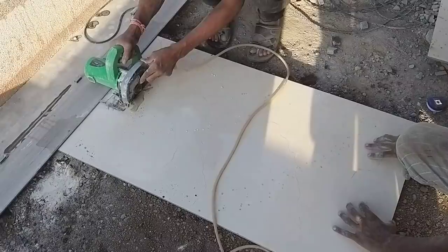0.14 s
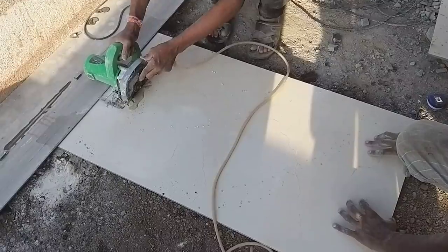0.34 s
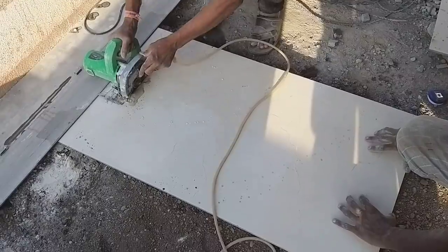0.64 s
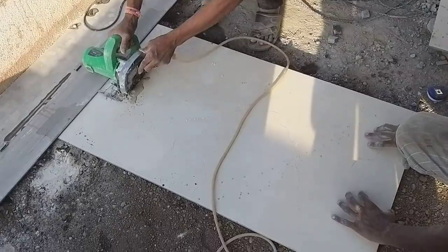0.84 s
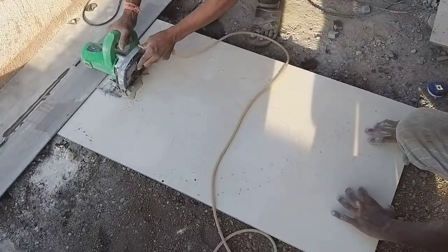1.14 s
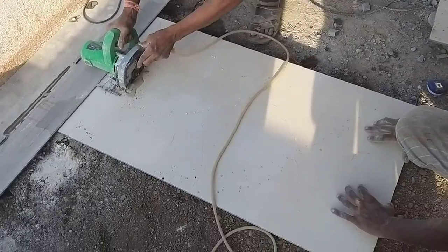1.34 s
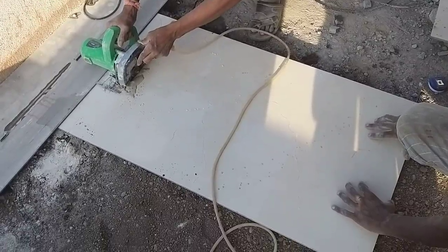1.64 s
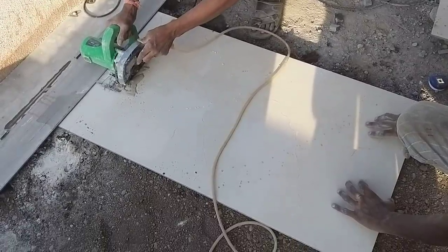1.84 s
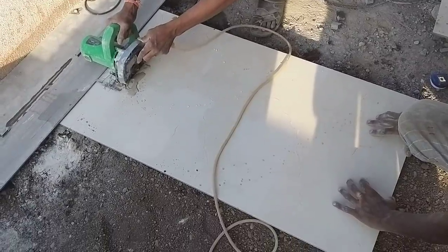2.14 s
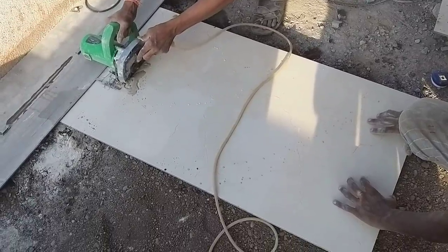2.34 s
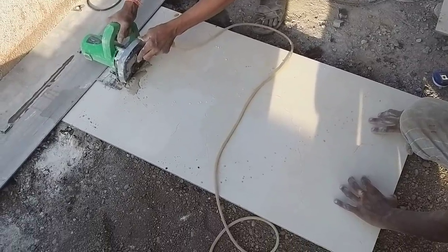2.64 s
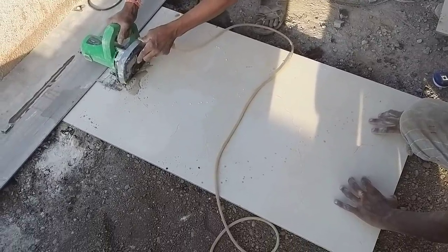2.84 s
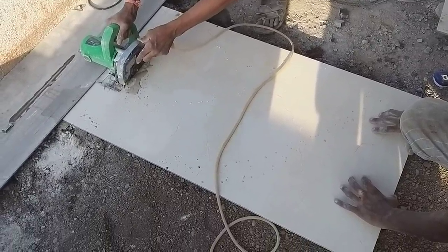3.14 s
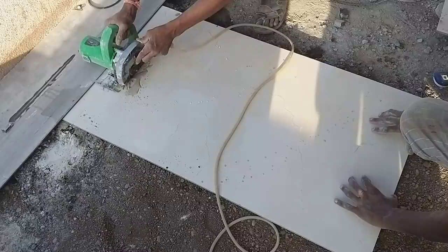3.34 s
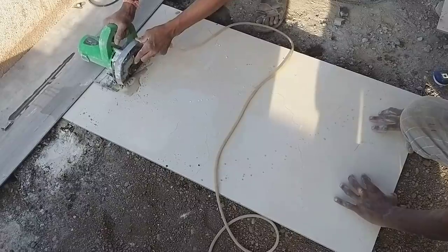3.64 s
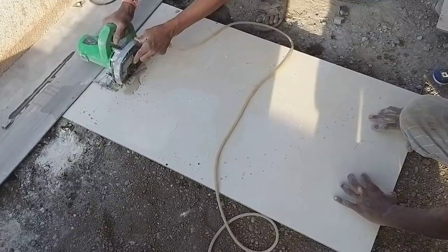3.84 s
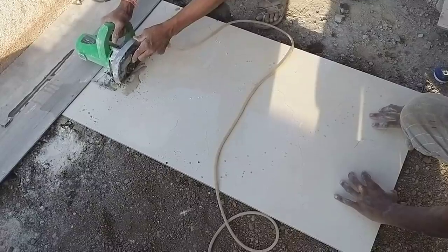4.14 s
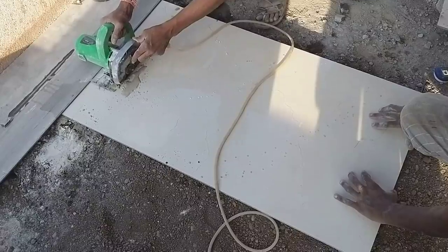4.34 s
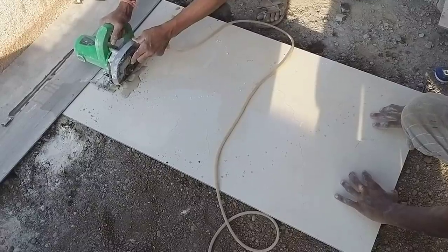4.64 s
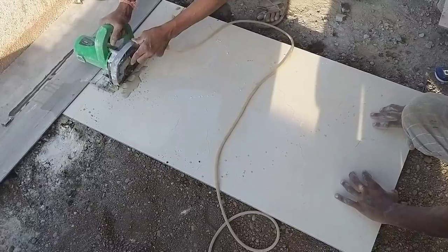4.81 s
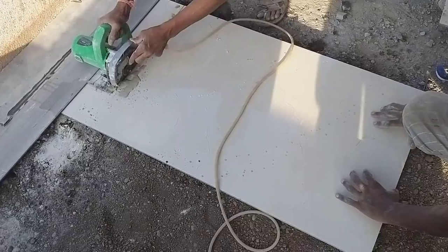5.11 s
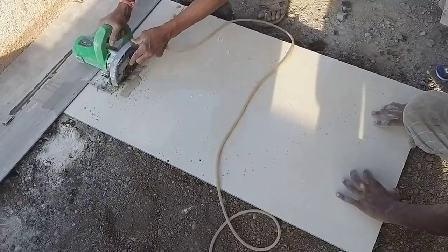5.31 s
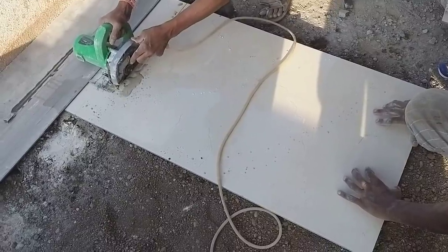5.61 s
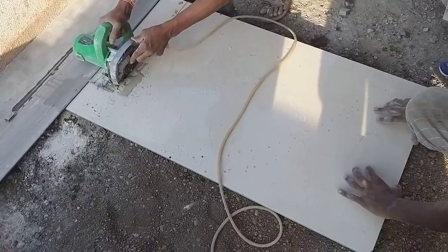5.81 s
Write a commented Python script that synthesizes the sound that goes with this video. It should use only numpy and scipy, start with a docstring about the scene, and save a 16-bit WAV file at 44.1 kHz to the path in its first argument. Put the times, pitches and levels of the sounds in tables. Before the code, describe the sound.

A handheld power cutter is already cutting tile as it begins, with some low rush beneath. At about a third of a second the sound jumps abruptly to thinner, brighter cutting. Near one second the motor bogs down and the whine sinks into hiss, then recovers. Steady grinding continues to the end, heard in stereo from about a metre and a half in a bare, reflective room.

```python
"""A handheld electric cutter dry-cuts a floor tile in a bare room, about a metre and a half from two microphones.
Random grit noise rings the modes of the steel blade; multiples of the spin whine as wavering sine lines.
The spin sags as the motor bogs down near 1 s, then recovers; the armature and fan add a thin whistle.
Hiss, rasp and hollow tile noise arrive by way of the walls, over a low rush of fan air and tile.
At a third of a second the levels step abruptly to another moment of cutting, and the low rush drops."""
import sys
import numpy as np
from scipy.fft import rfft, irfft, next_fast_len
from scipy.io import wavfile

SR = 44100
rng = np.random.default_rng(int(sys.argv[2]) if len(sys.argv) > 2 else 0)


def int16_out(signal):
    """Quantize to a 16-bit WAV file."""
    q = np.round(np.clip(np.atleast_2d(signal).T, -1, 1) * 32767)
    wavfile.write(sys.argv[1], SR, q.astype(np.int16))


N = 263277
TIME = np.arange(N) / SR
FREQ = np.maximum(np.fft.rfftfreq(next_fast_len(N), 1 / SR), 1)
# the sound jumps to another moment of cutting here, and the low rush drops away
SCENE_JUMP_S = .333
OPENING = TIME < SCENE_JUMP_S


def undb(db):
    """Decibels to gain."""
    return np.exp(np.asarray(db) * (np.log(10) / 20))


def curves(table):
    """Each column of a timed table, interpolated sample by sample."""
    start_s, *columns = np.transpose(table)
    return [np.interp(TIME, start_s, column) for column in columns]


def colour(points):
    """Gain at each frequency from (Hz, dB) points, joined along log frequency."""
    hz, db = np.transpose(points)
    return undb(np.interp(np.log(FREQ), np.log(hz), db))


def filtered(x, response):
    """Sound through a frequency response."""
    size = next_fast_len(N)
    spectrum = rfft(x.astype(np.float32), size) * response.astype(np.complex64)
    return irfft(spectrum, size)[..., :N]


def unit(x):
    """Scale to rms 1."""
    return x / np.sqrt(np.mean(x ** 2))


def walk(rate_hz):
    """Smooth chance with spread 1, changing about rate_hz times a second."""
    step = 64  # samples between random points
    size = next_fast_len(N // step + 2)
    smoothing = 1 + (np.fft.rfftfreq(size, step / SR) / rate_hz) ** 2
    points = irfft(rfft(rng.standard_normal(size)) / smoothing, size)
    points = unit(points).astype(np.float32)
    ramp = np.arange(step, dtype=np.float32) / step
    return (points[:-1, None] + np.diff(points)[:, None] * ramp).ravel()[:N]


def lorentzian(offset_hz, width_hz):
    """Power response of a resonance, 1 at its centre."""
    return 1 / (1 + (2 * offset_hz / width_hz) ** 2)


# blade speed, sagging under load: start_s [s], spin_hz [turns per second]
BLADE_SPIN = [(0, 177.8), (.32, 177.7), (.35, 175.7), (.63, 184.4), (.73, 178.9), (.91, 157.5),
              (.99, 152.8), (1.12, 168), (1.26, 178), (1.47, 184.4), (1.88, 190.4), (2.22, 186),
              (2.77, 182.5), (4.15, 180.8), (4.38, 179.4), (4.85, 182.2), (5.07, 181.4), (5.42, 185.3),
              (5.97, 185)]


def blade_spin():
    """Turns per second of the blade as the load on the motor changes."""
    spin_hz, = curves(BLADE_SPIN)
    return spin_hz


# below this speed the blade binds in the kerf
BINDS_BELOW_HZ = 177


def binding(spin_hz):
    """Hz by which the blade is dragged below its free cutting speed."""
    return np.maximum(BINDS_BELOW_HZ - spin_hz, 0)


# the blade leans on the wall of the kerf: middle_s [s], length_s [s], strength_db [dB]
KERF_LEANS = [(1.45, .4, -1), (2.327, .35, 2), (4.1, .35, 3.5), (4.55, 0.27, 6.5), (5.647, 1, 5)]


def lean():
    """Each lean of the blade swells and dies away smoothly, in dB; a negative one eases it off."""
    return sum(strength_db * np.exp(-(2 * (TIME - middle_s) / length_s) ** 2)
               for middle_s, length_s, strength_db in KERF_LEANS)


# how hard the hand feeds the blade into the tile: start_s [s], feed_db [dB re a steady push]
HAND_FEED = [(0, -2), (.35, 0.5), (.52, 3), (.72, -1), (1.5, -1), (1.85, 0.5), (2.27, 2.5), (2.55, 0.5),
             (3.05, 1.4), (3.7, -.5), (4.2, .5), (4.55, .5), (4.72, -0.7), (4.9, 1.1), (5.25, -1.1),
             (5.65, 0.3), (5.97, 0.5)]
# how each layer answers the cut; the first five are kinds of blade vibration:
# layer, level_db [dB], opening_db [dB more before the jump],
# kerf_db [dB per s as the kerf lengthens], per_feed [dB per dB of feed],
# per_lean [dB per dB of lean], per_drag [dB per Hz of binding]
LAYER_RESPONSES = [("flex", -20.8, -1.3, -.35, -.1, .1, .11), ("sing", -24.8, 1.6, -.5, .2, 0.3, -.09),
                   ("squeal", -28, 5, .25, -0.17, 0.96, -.05), ("zing", -23.5, 3.2, 0.064, .3, 0.16, -.04),
                   ("sizzle", -25, -2.3, 0.75, .45, .05, 0.033),
                   ("hiss", -16, -1.8, -0.074, 0.43, 0.059, -0.011),
                   ("rasp", -23.5, 1.3, 0.39, 1, 0.12, -0.07),
                   ("hollow", -39, 16.4, 0.54, 1.6, 0.22, -0.42),
                   ("rush", -40.5, 13.7, -.1, 0.65, .15, -0.18)]


def layer_levels(spin_hz):
    """Level of each layer in dB, from kerf length, feed, lean and binding of the blade."""
    feed_db, = curves(HAND_FEED)
    lean_db, drag_hz = lean(), binding(spin_hz)
    levels = {}
    for layer, level_db, opening_db, kerf_db, per_feed, per_lean, per_drag in LAYER_RESPONSES:
        cut_db = level_db + opening_db * OPENING + kerf_db * TIME
        hand_db = per_feed * feed_db + per_lean * lean_db
        levels[layer] = cut_db + hand_db + per_drag * drag_hz
    return levels


def contact(turns, once=0.065, twice=0.068, crunch_db=0.14):
    """Force at the rim: the blade runs slightly out of true and chips break off."""
    runout = 1 + once * np.cos(2 * np.pi * turns) + twice * np.cos(4 * np.pi * turns)
    return runout * undb(crunch_db * walk(60))


# modes of the steel disc: kind, pitch_hz [Hz], width_hz [Hz],
# level_db [dB re the level of that kind], lead_rad [radians by which left leads]
BLADE_MODES = [("grit", 2850, 90, -21, 1.2), ("flex", 3570, 220, -4, -1.4), ("flex", 3950, 400, -6, -2.2),
               ("grit", 4190, 120, -21, 2.3), ("sing", 4740, 200, -4, -.8), ("grit", 5680, 300, -19, 1.0),
               ("grit", 6400, 300, -19, 0), ("grit", 6980, 180, -19, 2.2), ("grit", 7760, 300, -17, .6),
               ("grit", 9050, 350, -19, .1), ("squeal", 9550, 190, -1.2, .3),
               ("grit", 10600, 500, -21, -.2), ("zing", 11480, 300, -4, -1.7),
               ("zing", 11790, 190, -4, -1.6), ("grit", 12380, 300, -13.5, -1.6),
               ("sizzle", 12780, 400, -2.2, -1.3), ("grit", 13810, 140, -15, 1.6),
               ("grit", 14170, 150, -17, 1.6), ("grit", 15120, 380, -8.5, -1.9)]


def blade(levels, grit_db=-1.24, flicker_db=2.0):
    """Grit rings the modes of the disc; each radiates to the two microphones with its own phase."""
    levels = dict(levels, grit=levels["hiss"] + grit_db)
    out = 0
    for kind, pitch_hz, width_hz, level_db, lead_rad in BLADE_MODES:
        detuning = pitch_hz / width_hz * (FREQ / pitch_hz - pitch_hz / FREQ)
        resonance = 1 / (1 + 1j * detuning) ** 2
        at_microphones = np.exp(.5j * lead_rad * np.array([[1], [-1]]))
        ring = filtered(rng.standard_normal(N), resonance * at_microphones)
        out = out + unit(ring) * undb(levels[kind] + level_db + flicker_db * walk(15))
    return out


def grit(scatter_db):
    """Dense micro-fractures of uneven size."""
    return unit(rng.standard_normal(N) * undb(scatter_db * rng.standard_normal(N)))


def diffuse(points, scatter_db):
    """Grit heard by way of the walls: unrelated at the two microphones."""
    pair = np.array([grit(scatter_db), grit(scatter_db)])
    return unit(filtered(pair, colour(points)))


def patchy(x, low_hz, high_hz, flicker_db, count):
    """Each stretch of the spectrum flickers on its own as the room's echoes beat together."""
    place = np.interp(np.log(FREQ), np.log([low_hz, high_hz]), [0, count - 1])
    out = 0
    for k in range(count):
        band = filtered(x, np.maximum(1 - abs(place - k), 0))
        out = out + band * undb(flicker_db * walk(28))
    return unit(out)


# spectrum of the hiss: pitch_hz [Hz], density_db [dB per Hz]
HISS_SPECTRUM = [(2400, -23.5), (3100, -2), (4300, 1), (5100, 1), (6000, -5.5), (6800, -5.5), (7350, -10),
                 (8600, -8), (9900, -4), (11200, 0.5), (12300, -8.5), (13400, 1.5), (15700, -5.5)]


def hiss(level_db):
    """Bright scrape of fine grit, flickering in six bands."""
    scrape = diffuse(HISS_SPECTRUM, scatter_db=1.5)
    scrape = patchy(scrape, 2800, 15800, flicker_db=2.0, count=6)
    return scrape * undb(level_db + 0.3 * walk(9.2))


# spectrum of the rasp: pitch_hz [Hz], density_db [dB per Hz]
RASP_SPECTRUM = [(600, -26), (900, -10), (1120, 1.5), (1900, 1), (2500, 1), (2850, 1), (3300, -0.5),
                 (4500, -46)]


def rasp(level_db, flutter, bite):
    """Mid-range scrape of more uneven grit, following the flutter and bite of the rim."""
    scrape = diffuse(RASP_SPECTRUM, scatter_db=7)
    scrape = patchy(scrape, 1310, 2500, flicker_db=2.0, count=3)
    return scrape * undb(level_db + 0.87 * flutter + 0.57 * bite)


# spectrum of the hollow layer: pitch_hz [Hz], density_db [dB per Hz]
HOLLOW_SPECTRUM = [(200, -19), (400, -3), (550, 2.5), (750, 1.5), (1000, 1), (1500, -12.5), (3000, -31)]


def hollow(level_db, flutter, bite):
    """Lower, hollow grinding of very uneven grit, sharing the flutter and bite of the rasp."""
    return diffuse(HOLLOW_SPECTRUM, scatter_db=8.5) * undb(level_db + 2.4 * flutter + .8 * bite)


def partial(turns, multiple, usual_hz, waver_db=1.2, room=.2):
    """One line of the whine: a wavering direct tone plus shifting reflections at each microphone."""
    mode_hz, lead_rad = np.transpose([(mode[1], mode[4]) for mode in BLADE_MODES])
    # the line takes the left-right phase of the nearest blade mode
    nearest = np.argmin(abs(mode_hz - multiple * usual_hz))
    lead = lead_rad[nearest]
    phase = (2 * np.pi * ((multiple * turns + rng.random()) % 1)).astype(np.float32)
    cos, sin = np.cos(phase), np.sin(phase)
    pair = []
    for angle in (-lead / 2, lead / 2):
        in_phase = (np.cos(angle) + room * walk(16)) * cos
        quadrature = (np.sin(angle) + room * walk(16)) * sin
        pair.append(in_phase + quadrature)
    return unit(np.array(pair) * undb(waver_db * walk(12)))


# share of its power that a leading line keeps far from its resonance
OFF_RESONANCE = 0.023
# the strongest multiples of the spin sing out when the speed tunes them to a resonance:
# multiple, resonance_hz [Hz], width_hz [Hz], level_db [dB on resonance],
# opening_db [dB more before the jump], kerf_db [dB per s as the kerf lengthens],
# per_lean [dB per dB of lean]
LEADING_LINES = [(19.03, 3480, 310, -37, -5, 1.33, 1), (23.1, 4150, 87, -26.5, 6, 0.2, 0),
                 (26, 4730, 110, -32.3, -3, 1.55, 0.82), (37.3, 6980, 220, -33.5, 3, 0.1, -.3),
                 (51.9, 9620, 120, -35.5, 1.5, 0.9, 1.9)]
# weaker multiples of the spin, before tuning and growth:
# multiple, before_db [dB before the jump], after_db [dB after the jump]
WEAK_LINES = [(12, -42, -39), (13, -41, -39), (15, -40, -38), (16, -28, -39), (18, -40, -44),
              (20, -36, -37), (21, -39, -36), (22, -36, -32), (24, -33, -37), (25, -29, -34),
              (27, -50, -38), (28, -47, -38), (30, -47, -38), (31, -35, -39), (32, -34, -40),
              (34, -42, -39), (35, -42, -38), (36, -37, -36), (42, -50, -40), (51, -46, -37),
              (53, -35, -32), (54, -30, -40), (64, -36, -34), (65, -38, -32), (70, -37, -33)]


def whine(turns, spin_hz, weak_db=-2, weak_db_per_s=.8, swell_db=1.5, bind_db_per_hz=0.4):
    """The same rim segments strike on every turn and sound a stack of multiples of the spin."""
    off_mode = .15  # power left between the blade modes
    usual_hz, lean_db = np.median(spin_hz), lean()
    out = 0
    for multiple, resonance_hz, width_hz, level_db, opening_db, kerf_db, per_lean in LEADING_LINES:
        tuning = np.sqrt(OFF_RESONANCE + lorentzian(multiple * spin_hz - resonance_hz, width_hz))
        line_db = level_db + opening_db * OPENING + kerf_db * TIME
        line_db = line_db + per_lean * lean_db + swell_db * walk(5.5)
        out = out + partial(turns, multiple, usual_hz) * tuning * undb(line_db)
    body = off_mode + sum(lorentzian(FREQ - mode[1], mode[2]) for mode in BLADE_MODES)
    # the lines firm up as the lengthening kerf steadies the blade
    growth = undb(weak_db + weak_db_per_s * TIME)
    for multiple, before_db, after_db in WEAK_LINES:
        # after the jump a line swells on a blade mode and fades beside it
        tuning = unit(np.interp(multiple * spin_hz, FREQ, body))
        gain = np.where(OPENING, undb(before_db), undb(after_db) * growth * tuning)
        out = out + partial(turns, multiple, usual_hz) * gain
    # a binding blade chatters at random, so the lines sink into the hiss
    return out * undb(-bind_db_per_hz * binding(spin_hz))


# the armature turns faster than the geared blade: multiples of the blade spin, fan line then upper line
MOTOR_MULTIPLES = (23.35, 35.6)


def motor(turns, usual_hz, fan_db=-38, upper_db=-44):
    """Thin whistle of the armature and its fan, locked to the blade through the gears."""
    return sum(partial(turns, multiple, usual_hz) * undb(level_db)
               for multiple, level_db in zip(MOTOR_MULTIPLES, (fan_db, upper_db)))


# spectrum of the low rush: pitch_hz [Hz], density_db [dB per Hz]
RUSH_SPECTRUM = [(20, -24), (45, -15), (75, -4), (105, 2), (165, 3), (240, 0), (320, 1), (420, -4),
                 (900, -33)]


def rush(level_db, flutter):
    """Low noise of fan air and tile, fluttering with the cut and on its own."""
    return diffuse(RUSH_SPECTRUM, scatter_db=7) * undb(level_db + 1.6 * flutter + 1.9 * walk(28))


def scene():
    """Blade and hiss follow the force at the rim; rasp, hollow and rush share one flutter."""
    spin_hz = blade_spin()
    turns = np.cumsum(spin_hz) / SR
    levels = layer_levels(spin_hz)
    flutter = walk(54)
    # the bite of the rim is uneven from moment to moment
    bite = walk(5.2)
    cutting = (blade(levels) + hiss(levels["hiss"])) * contact(turns)
    scraping = rasp(levels["rasp"], flutter, bite) + hollow(levels["hollow"], flutter, bite)
    tones = whine(turns, spin_hz) + motor(turns, np.median(spin_hz))
    return cutting + scraping + tones + rush(levels["rush"], flutter)


# upper limit of the microphones
TOP_HZ = 15800
# left-right difference of the microphones: pitch_hz [Hz], balance_db [left minus right, dB]
MICROPHONE_BALANCE = [(50, -2), (250, 0.2), (1200, 2), (2500, 1.5), (4000, -0.5), (9000, 0.5), (15000, 1.1)]


def record(dry):
    """The two microphones differ slightly in colour; a steep low-pass cuts the top."""
    balance = colour(MICROPHONE_BALANCE) ** np.array([[.5], [-.5]])
    low_pass = 1 / np.sqrt(1 + (FREQ / TOP_HZ) ** 600)
    return filtered(dry, balance * low_pass)


dry = scene()
out = record(dry)
int16_out(out)
```